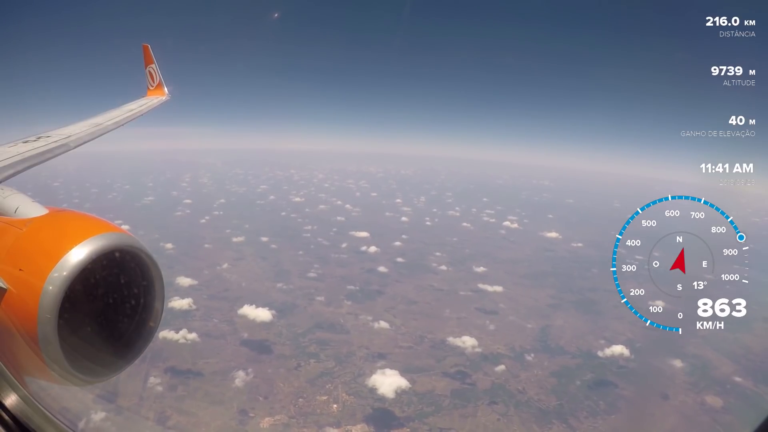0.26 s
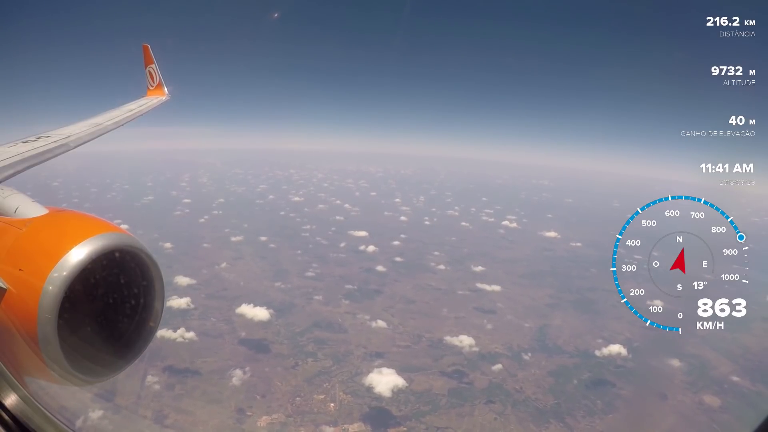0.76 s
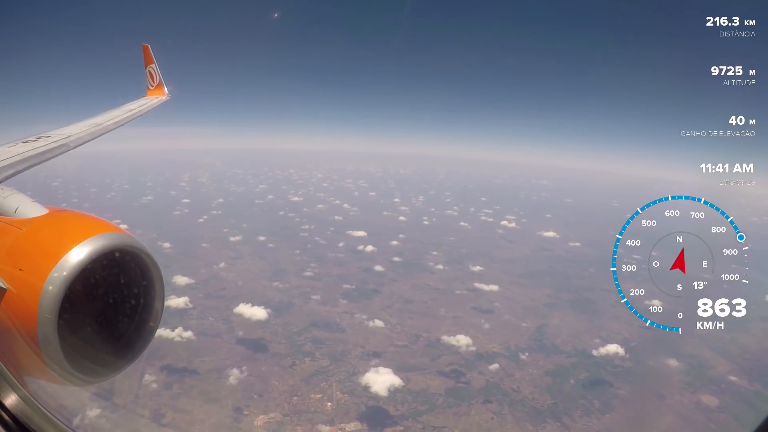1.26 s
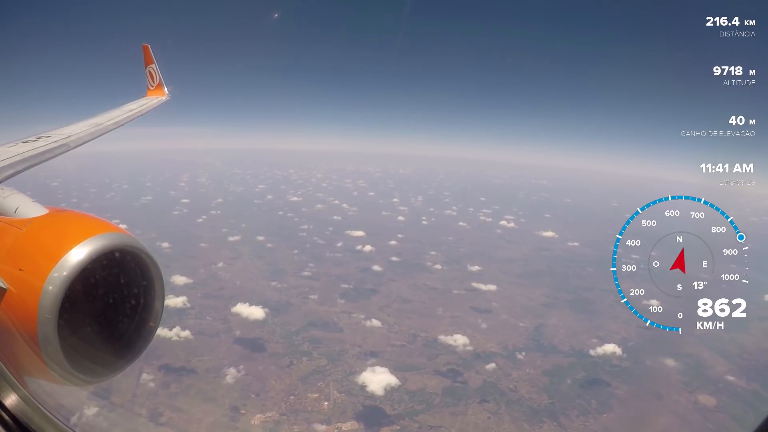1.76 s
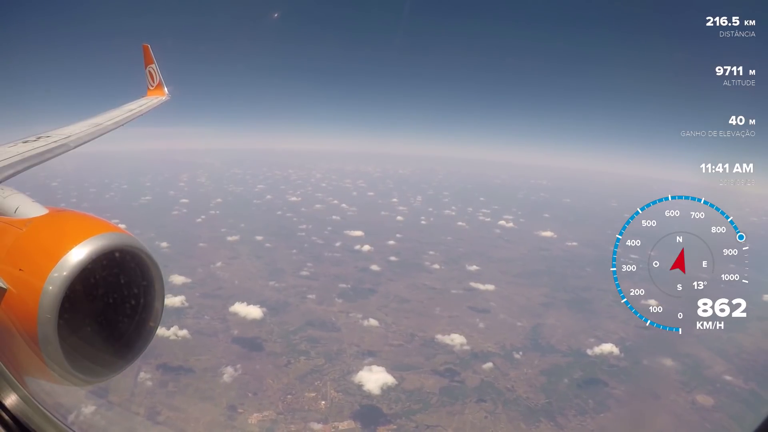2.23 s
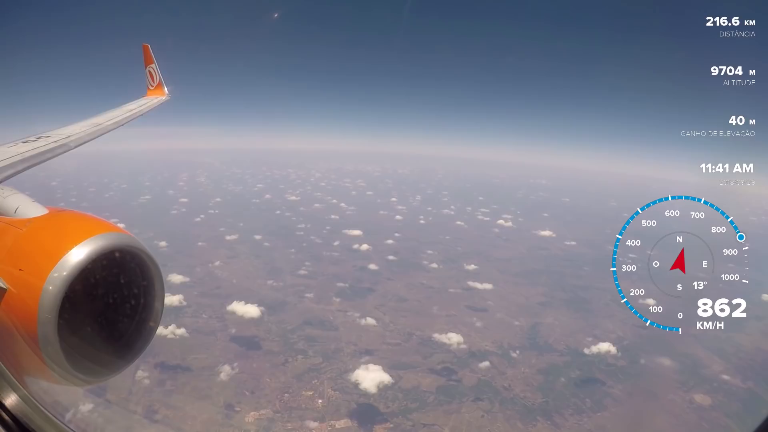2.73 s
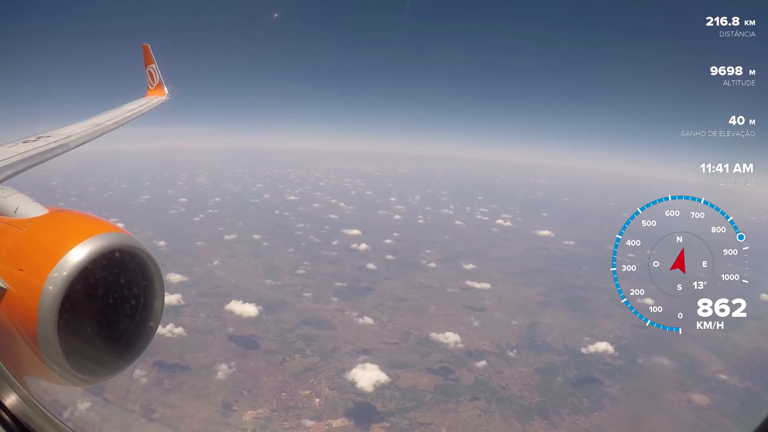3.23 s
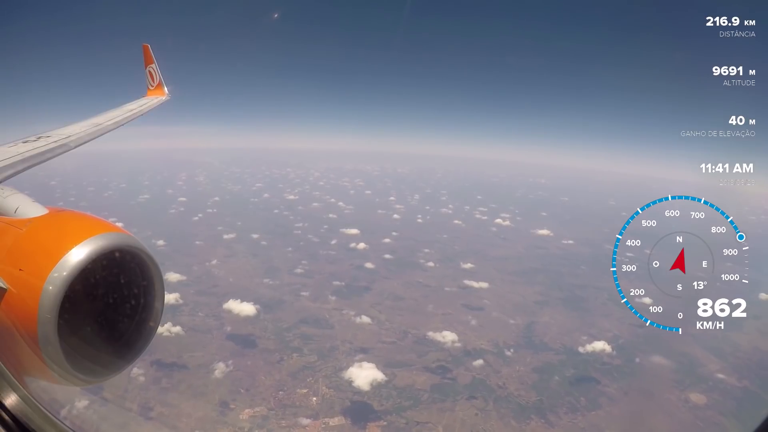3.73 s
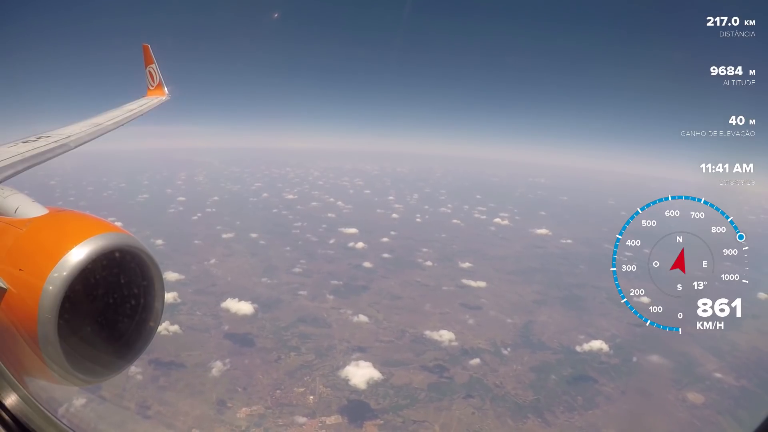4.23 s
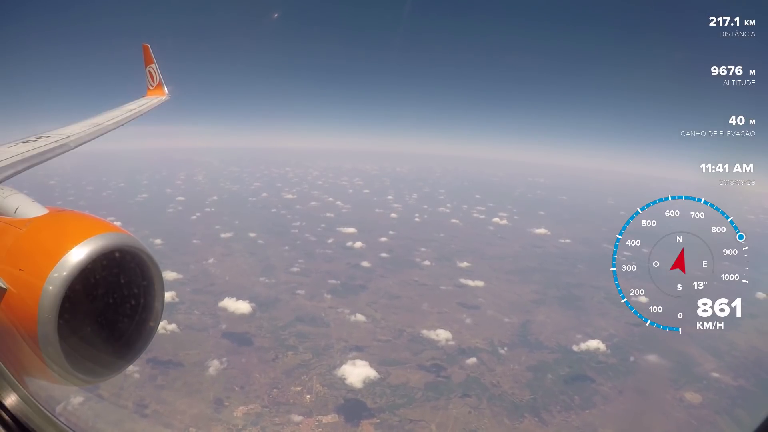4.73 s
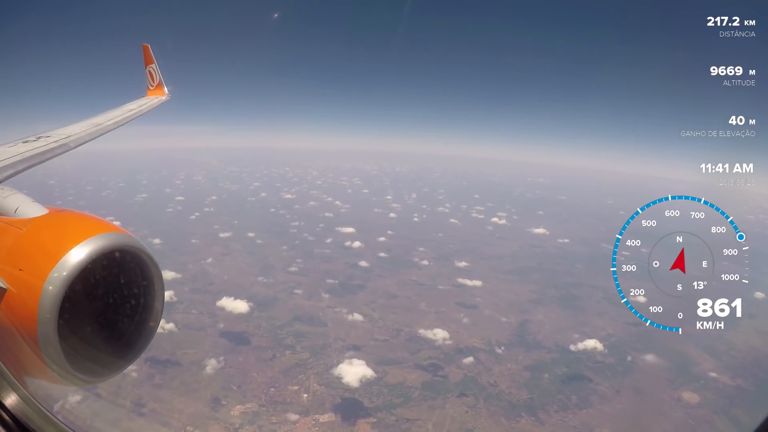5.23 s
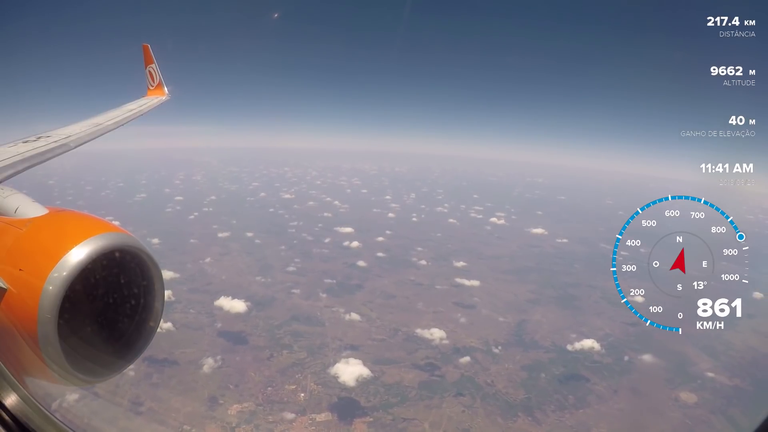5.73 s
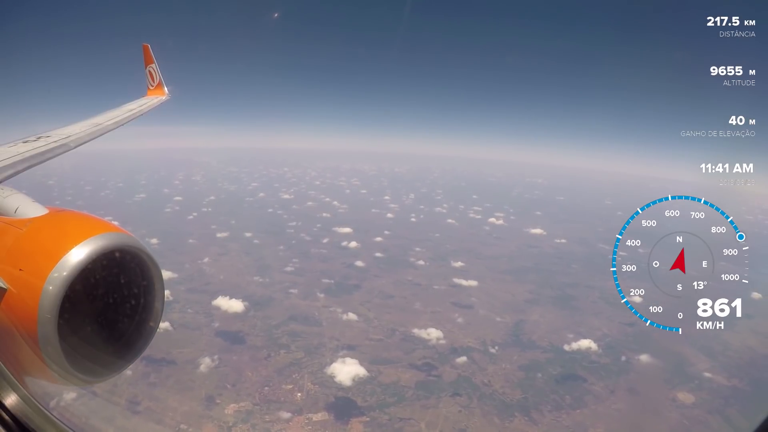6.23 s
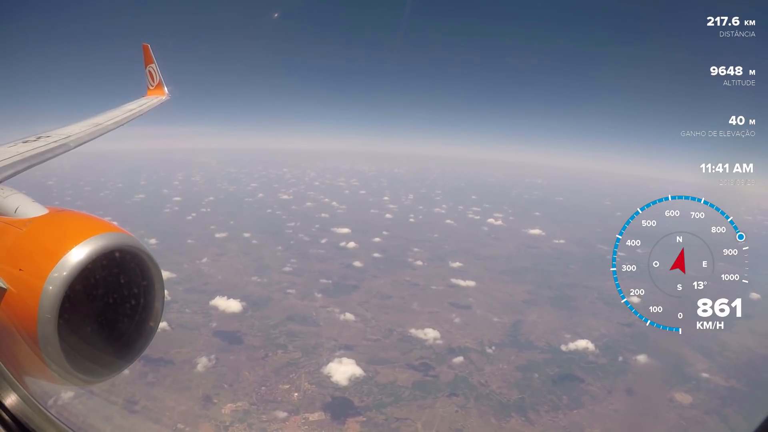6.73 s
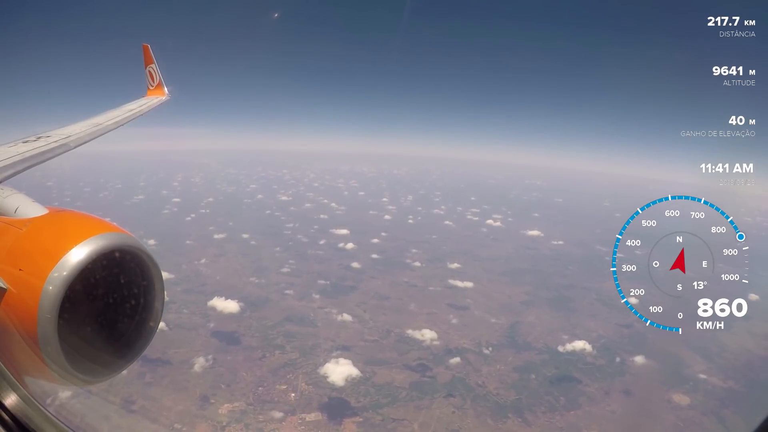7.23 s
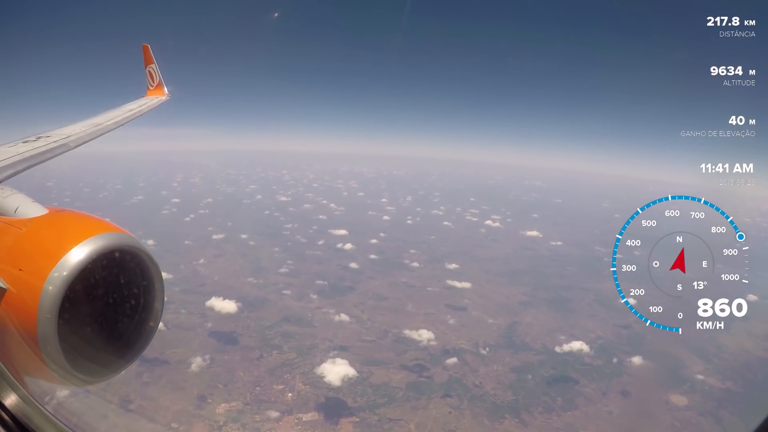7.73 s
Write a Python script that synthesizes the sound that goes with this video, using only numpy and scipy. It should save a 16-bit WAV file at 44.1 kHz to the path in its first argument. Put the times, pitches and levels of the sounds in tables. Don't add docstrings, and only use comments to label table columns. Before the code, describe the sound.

Steady low airliner cabin roar with a deep engine hum and unsteady droning, a few faint rustles, and one thin wheel squeak near the end.

```python
import sys
import numpy as np
from scipy import signal
from scipy.fft import rfft, irfft, next_fast_len
from scipy.io import wavfile
from scipy.ndimage import uniform_filter1d, minimum_filter1d

SR = 44100
rng = np.random.default_rng(int(sys.argv[2]) if len(sys.argv) > 2 else 0)


def generate_wav(sig):
    pcm = np.round(np.clip(np.atleast_2d(sig).T, -1, 1) * 32767).astype(np.int16)
    wavfile.write(sys.argv[1], SR, pcm)


def voltage_ratio(decibels):
    exponent = np.asarray(decibels, float) / 20
    return 10 ** exponent


N = 351458
TIME = np.arange(N) / SR
HZ = np.fft.rfftfreq(next_fast_len(N), 1 / SR)

# frequency in Hz, density in dB per Hz.
RUSH_SPECTRUM = [(4, -60), (12, -54), (24, -50.5), (38, -51), (55, -46), (80, -46.5), (115, -46),
                 (220, -50.5), (420, -57), (800, -63), (1500, -70), (2400, -78.5), (2700, -83), (2850, -87),
                 (3300, -97)]
# centre in Hz, width in Hz, height in dB (negative = dip).
PANEL_MODES = [(16, 4, 6), (44, 9, 9), (63, 15, 3.5), (108, 30, -3), (135, 16, 1), (158, 13.2, 4),
               (185.8, 25, 3.5), (247, 17, 2.5), (321.5, 31, -3), (350.3, 40, 4.5), (455, 45, -4.5),
               (599, 78, 7), (530, 60, 1.5), (690, 76, 3), (724, 36, -4.5), (918, 150, -4), (1065, 90, 0.5),
               (1150, 43, -5), (1194, 16, 0), (1366, 85, 1.5), (1566, 42, -7.5), (1657, 99, 1),
               (1850, 110, -1), (2125, 90, 4), (2315, 120, 3.5)]
# centre in seconds, level in dB, length in seconds, pitch in Hz.
VORTEX_LOCKS = [(0.028, -21, 0.068, 138.7), (0.128, -19, 0.036, 153), (0.221, -20, 0.066, 138),
                (0.674, -23, 0.033, 143), (0.824, -21, 0.099, 153.1), (1.016, -23, 0.03, 139),
                (1.261, -25, 0.029, 152), (1.357, -25, 0.14, 139.7), (1.476, -21.5, 0.036, 136),
                (1.564, -18.5, 0.034, 144), (1.693, -23.5, 0.043, 146.6), (1.873, -22, 0.027, 155),
                (2.073, -21, 0.032, 138), (2.211, -24.5, 0.039, 140.2), (2.504, -23, 0.061, 140.3),
                (2.682, -23.5, 0.029, 153), (2.852, -23, 0.021, 138), (3.011, -26, 0.041, 149),
                (3.403, -22, 0.037, 162), (3.487, -20.5, 0.043, 143), (3.567, -18.5, 0.04, 147.6),
                (3.634, -19.5, 0.033, 148), (3.723, -21, 0.038, 147), (3.896, -20.5, 0.042, 154),
                (4.109, -19, 0.059, 146.5), (4.205, -22.5, 0.032, 137), (4.393, -22.5, 0.043, 142),
                (4.511, -19.5, 0.033, 144), (4.917, -25, 0.037, 138), (5.065, -22.7, 0.037, 147.6),
                (5.222, -21, 0.049, 150.6), (5.297, -20.5, 0.032, 144), (5.507, -22.5, 0.087, 149),
                (5.585, -23, 0.032, 140.1), (5.693, -25, 0.021, 156), (5.788, -22.5, 0.11, 140),
                (5.885, -21.5, 0.067, 148), (5.945, -25, 0.074, 139), (6.16, -21.5, 0.039, 139),
                (6.351, -20, 0.028, 143), (6.584, -21, 0.05, 142), (6.76, -25, 0.034, 153.3),
                (7.058, -24, 0.067, 139.4), (7.215, -19, 0.05, 141.8), (7.503, -18.5, 0.026, 144),
                (7.605, -18.5, 0.075, 145.3), (7.687, -22, 0.039, 142), (7.863, -24, 0.018, 139.7)]
# multiple of the turning rate, level in dB.
SHAFT_HARMONICS = [
    (1, 0),
    (2, -13),
]
# start in seconds, level in dB, length in seconds, centre in Hz, width in Hz.
SCRAPES = [(.138, -57, .03, 6200, 5200), (.58, -55.5, .036, 5200, 3000), (.70, -65, .02, 6000, 3500),
           (1.278, -55, .032, 5000, 4200), (1.845, -57, .026, 5600, 4400), (1.845, -62, .024, 9300, 2200),
           (2.07, -54.5, .03, 5700, 2000), (2.07, -62, .026, 9000, 2600), (2.953, -58.5, .027, 5200, 2800),
           (5.585, -59.5, .028, 9600, 4500), (5.59, -54, .052, 5600, 2800), (5.584, -47.5, .04, 2700, 1800),
           (5.63, -62, .04, 7500, 6000), (5.72, -68, .03, 8000, 6000), (6.03, -66, .04, 7500, 4500),
           (6.302, -59.5, .08, 5900, 3000), (6.38, -59, .016, 6300, 3600), (6.659, -60.5, .045, 5700, 2200),
           (6.64, -63, .05, 4000, 1400), (7.06, -67, .03, 8500, 3500), (7.215, -65, .04, 7800, 4600)]
# time in seconds, pitch in Hz.
SQUEAK_PITCH = [(6.55, 3275), (6.6, 3230), (6.63, 3215), (6.65, 3010), (6.69, 3080), (6.72, 3210),
                (6.87, 3228), (6.912, 3270), (6.925, 3345), (6.96, 3375)]
# start in seconds, length in seconds, tone in dB, octave in dB.
BEARING_GRIPS = [(6.556, .016, -51.5, -74), (6.576, .016, -47, -72), (6.592, .02, -66, -64),
                 (6.608, .019, -51, -78), (6.632, .034, -58.5, -78), (6.676, .018, -58.5, -72),
                 (6.712, .026, -60, -65), (6.738, .022, -49.5, -58.5), (6.762, .031, -52, -61),
                 (6.793, .035, -56, -74), (6.828, .044, -49.5, -60), (6.88, .02, -54.5, -63.5),
                 (6.9, .017, -60, -59), (6.919, .021, -51.5, -65), (6.94, .024, -59, -72)]
# frequency in Hz, density in dB per Hz.
VENT_SPECTRUM = [(2900, -97.5), (3500, -90), (4500, -95.5), (5000, -98), (6600, -101.4), (7100, -105.0),
                 (7800, -106.0), (8600, -105.0), (10000, -109.9), (10600, -113.4), (11200, -119.4),
                 (13000, -129.4)]
# time in seconds, level in dB about its mean.
FLOW_LEVEL = [(0, 2.5), (.5, 0.3), (1.6, 0.5), (2.05, 2.5), (2.35, -3.5), (3.3, 1), (4.8, -2), (5.6, 1),
              (7.2, 1.5), (7.7, -0.6), (7.97, 0.5)]
# frequency in Hz, threshold in dB over the usual
GATE_THRESHOLD = [(6600, -9), (7400, -1.5), (8400, -4.5), (9200, -.8), (10200, .1), (10700, 1.5),
                  (11100, 4.2), (12500, 6.5)]


def unit(x):
    return x / np.sqrt(np.mean(x ** 2))


def curve(table):
    seconds, values = np.transpose(table)
    return np.interp(TIME, seconds, values)


def walk(rate):
    hold = int(SR / rate)
    steps = np.repeat(rng.standard_normal(N // 500), hold)[:N]
    x = uniform_filter1d(uniform_filter1d(steps, hold), hold)
    return unit(x - x.mean())


def colour(points):
    f, db = np.transpose(points)
    return voltage_ratio(np.interp(np.log(HZ + 1), np.log(f + 1), db, left=-np.inf, right=-np.inf))


def shaped(x, gain):
    size = next_fast_len(N)
    return irfft(rfft(x, size) * gain, size)[:N]


def share(x, lo_hz, hi_hz):
    return np.std(shaped(x, (HZ > lo_hz) & (HZ < hi_hz)))


def turbulence(gain, bands, flicker_db, rate):
    noise = rng.standard_normal(N)
    place = 2 * np.log2(HZ + 1)
    out = np.zeros(N)
    for band in bands:
        window = np.clip(1 - np.abs(place - band), 0, 1)
        out += voltage_ratio(flicker_db * walk(rate)) * shaped(noise, gain * window)
    return out


def wall(rush_db):
    modes_db = sum(db / (1 + (2 * (HZ - f) / width) ** 2) ** 2 for f, width, db in PANEL_MODES)
    rush = turbulence(colour(RUSH_SPECTRUM) * voltage_ratio(modes_db), range(7, 25), flicker_db=0.5, rate=4)
    return voltage_ratio(rush_db) * rush / share(rush, 200, 2800)


def drone():
    lock_gain_db, lock_stretch, takes_over_db = -1.2, 1.3, -26
    loose_db, loose_hz, loose_width_hz = -30, 143, 22
    beads = np.zeros(N, complex)
    for s, db, length, hz in VORTEX_LOCKS:
        t = TIME - s
        swell = np.exp(-(2 * t / (lock_stretch * length)) ** 2 / 2)
        phase = 2 * np.pi * (hz * t + rng.random())
        beads += voltage_ratio(db + lock_gain_db) * swell * np.exp(1j * phase)
    resonance = 1 / (1 + (2 * (HZ - loose_hz) / loose_width_hz) ** 2)
    loose = unit(shaped(rng.standard_normal(N), resonance))
    free = 1 / (1 + (np.abs(beads) / voltage_ratio(takes_over_db)) ** 2)
    return np.sqrt(2) * beads.imag + voltage_ratio(loose_db) * free * loose


def shaft():
    shaft_hz, sag_hz_per_s, level_db = 32.62, .013, -24.5
    turn = 2 * np.pi * np.cumsum(shaft_hz - sag_hz_per_s * TIME) / SR
    hum = sum(voltage_ratio(db) * np.sin(k * turn) for k, db in SHAFT_HARMONICS)
    return np.sqrt(2) * voltage_ratio(level_db) * hum


def rustles():
    top_hz = 11900
    t = np.arange(8192) / SR
    f = np.fft.rfftfreq(len(t), 1 / SR)
    out = np.zeros(N)
    for s, db, length, hz, width in SCRAPES:
        rise = np.clip(t / (.2 * length), 0, 1)
        tail = np.exp(-np.clip(t - .6 * length, 0, None) / (.35 * length))
        grain = voltage_ratio(3 * unit(uniform_filter1d(rng.standard_normal(len(t)), size=40)))
        noise = rng.standard_normal(len(t)) * grain
        band = np.exp(-(2 * (f - hz) / width) ** 2 / 2 - (f / top_hz) ** 10)
        scrape = unit(irfft(rfft(noise) * band, len(t)))
        i = int(s * SR)
        out[i:i + len(t)] += voltage_ratio(db) * rise * tail * scrape
    return out


def squeak():
    edge_s = .009
    turn = 2 * np.pi * np.cumsum(curve(SQUEAK_PITCH) * (1 + .0015 * walk(70))) / SR
    out = np.zeros(N)
    for s, length, db, octave_db in BEARING_GRIPS:
        inside = np.minimum(TIME - s, s + length - TIME)
        grip = np.clip(inside / edge_s + .5, 0, 1)
        out += grip * (voltage_ratio(db) * np.sin(turn) + voltage_ratio(octave_db) * np.sin(2 * turn))
    return np.sqrt(2) * voltage_ratio(1.1 * walk(80)) * out


def vents(vent_db):
    hiss = turbulence(colour(VENT_SPECTRUM), range(22, 29), flicker_db=1.0, rate=11)
    hiss = hiss / share(hiss, 7000, 10500)
    top = shaped(hiss, 1 / (1 + (5600 / (HZ + 1)) ** 6) / (1 + (HZ / 9800) ** 8))
    steady_db = np.median(vent_db)
    rest_db = steady_db + 0.32 * (vent_db - steady_db)
    return voltage_ratio(rest_db) * (hiss - top) + voltage_ratio(vent_db) * top


def scene():
    flow_db = curve(FLOW_LEVEL)
    rush_db = -27 - 0.09 * TIME + .15 * flow_db
    air = voltage_ratio(0.54) * wall(rush_db) + drone() + vents(-71 + flow_db)
    return (air + shaft() + rustles() + squeak())[None]


def gate(x):
    bins_per_band, adapts, rides_up_to, jitter_db = 4, .9, 2.4, 1.2
    frames = dict(window="cosine", nperseg=2048, noverlap=1024)
    cells = signal.stft(x, **frames)[2]
    band = np.arange(cells.shape[1]) // bins_per_band
    starts = np.arange(0, len(band), bins_per_band)
    power = np.add.reduceat(np.abs(cells) ** 2, starts, axis=1)[:, band]
    power = power / np.median(power, axis=2, keepdims=True)
    nearby = uniform_filter1d(uniform_filter1d(power, size=90, axis=1), size=3, axis=2)
    f, db = np.transpose(GATE_THRESHOLD)
    floor = voltage_ratio(2 * np.interp(band * bins_per_band * SR / 2048, f, db, left=-99))[:, None]
    floor = floor * voltage_ratio(2 * jitter_db * rng.standard_normal(cells.shape[2]))
    heard = power > floor * np.clip(nearby, 0, rides_up_to) ** adapts
    return signal.istft(cells * heard, **frames)[1][:, :N]


def roll_off(x):
    return signal.sosfilt(signal.butter(12, 12500, fs=SR, output="sos"), x)


def record(dry):
    held = -minimum_filter1d(-np.abs(dry), size=300, axis=1)
    envelope = uniform_filter1d(uniform_filter1d(held, size=300, axis=1), size=150, axis=1)
    gain = (1 + (envelope / 0.29) ** 4) ** (-.55 / 4)
    return roll_off(gate(gain * dry))


dry = scene()
out = record(dry)
generate_wav(out)
```